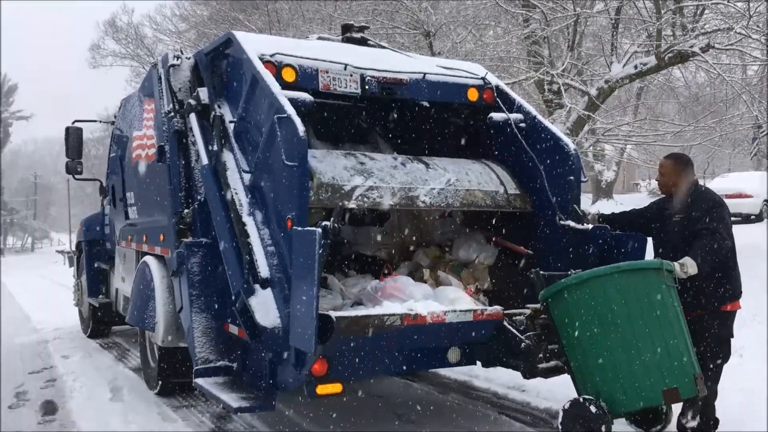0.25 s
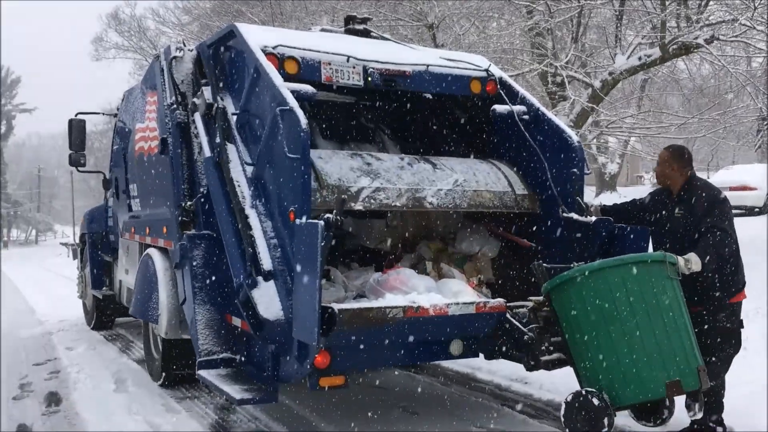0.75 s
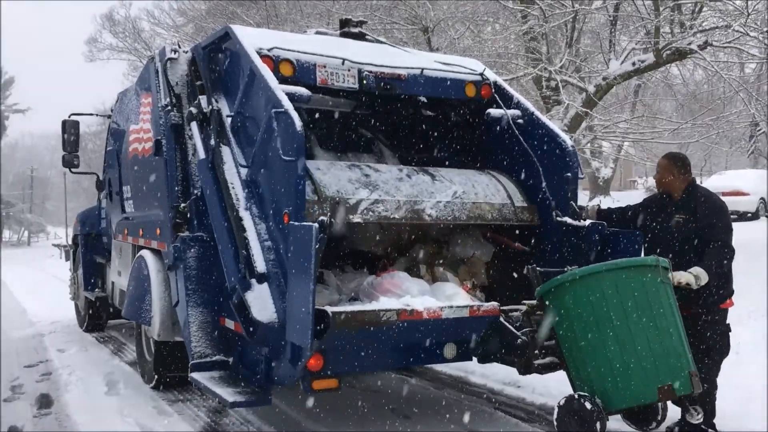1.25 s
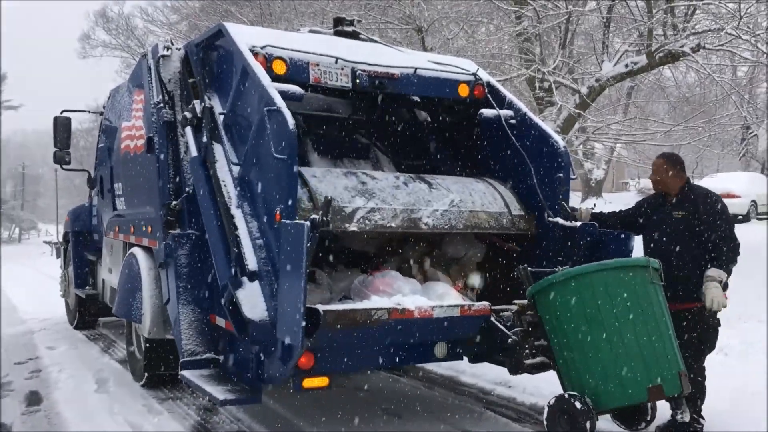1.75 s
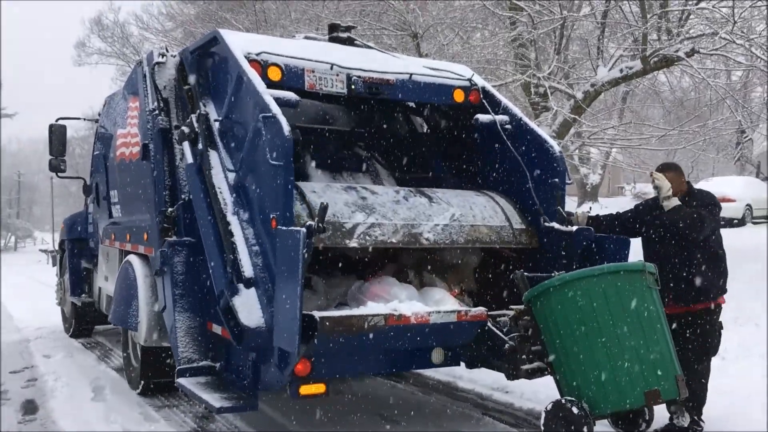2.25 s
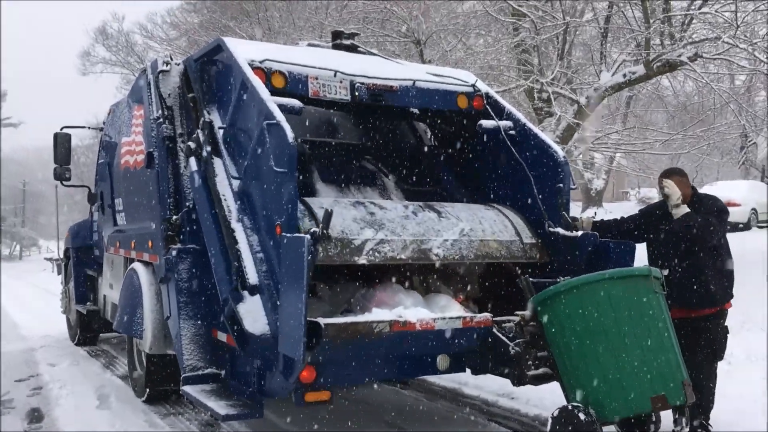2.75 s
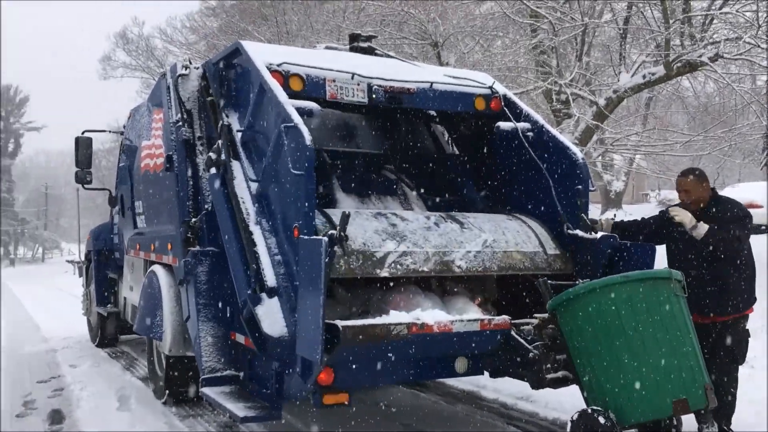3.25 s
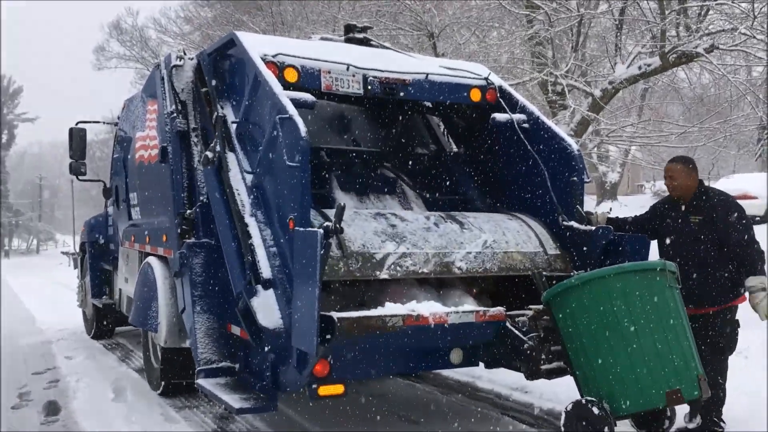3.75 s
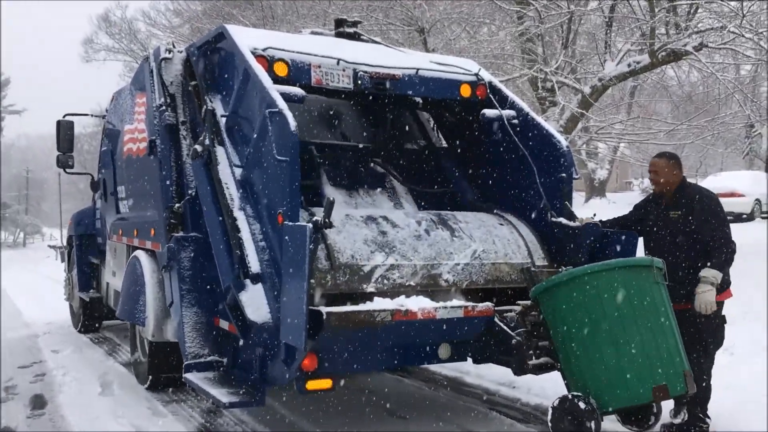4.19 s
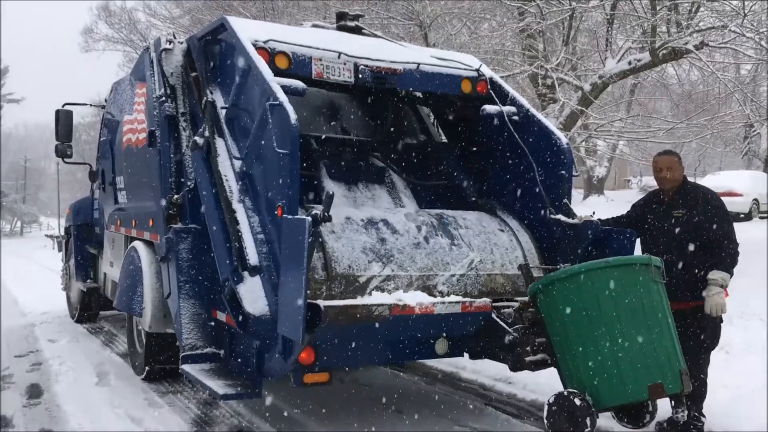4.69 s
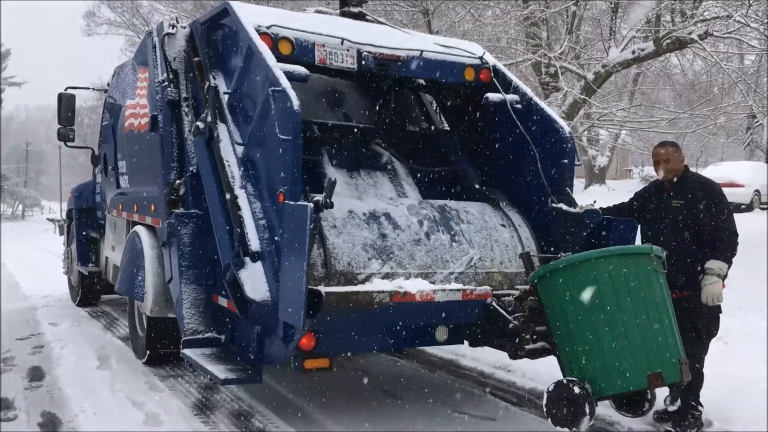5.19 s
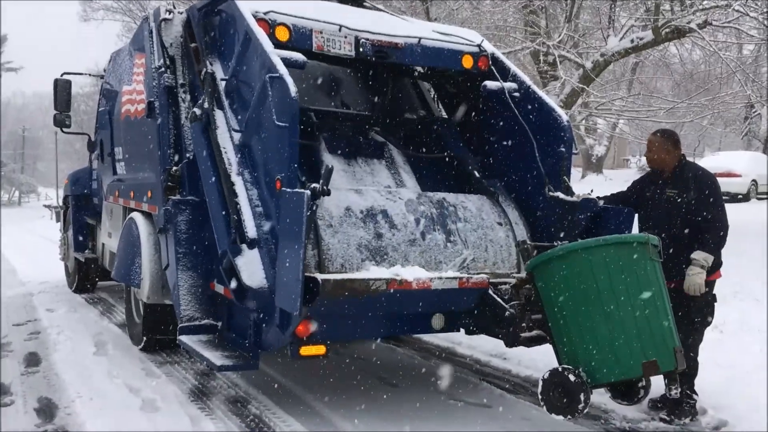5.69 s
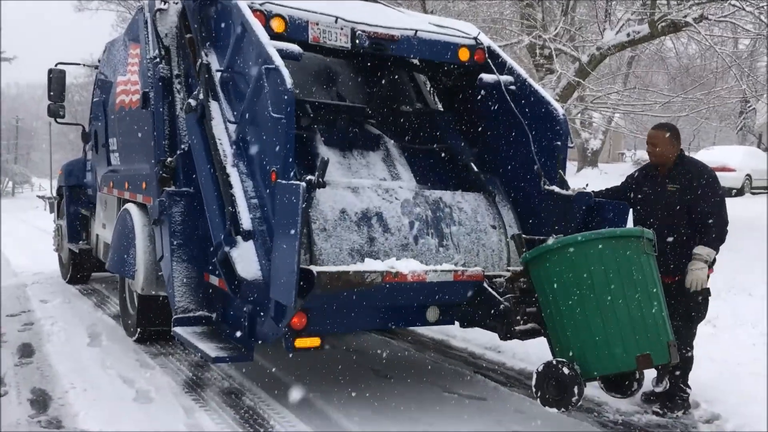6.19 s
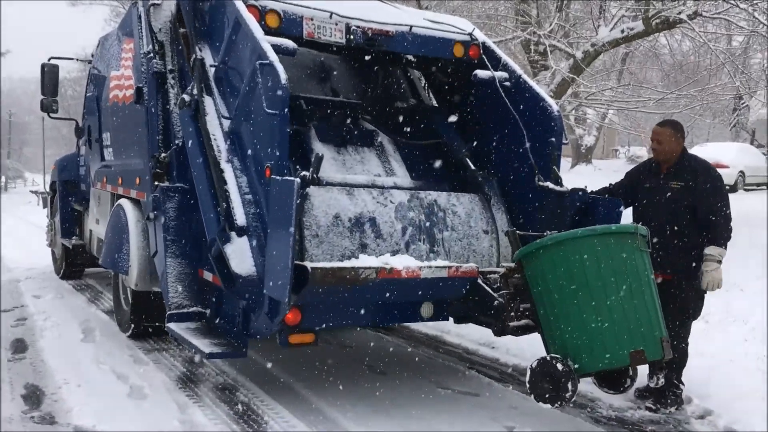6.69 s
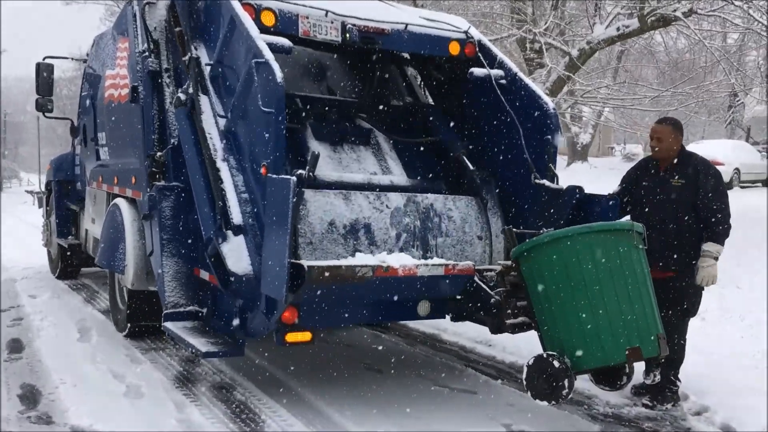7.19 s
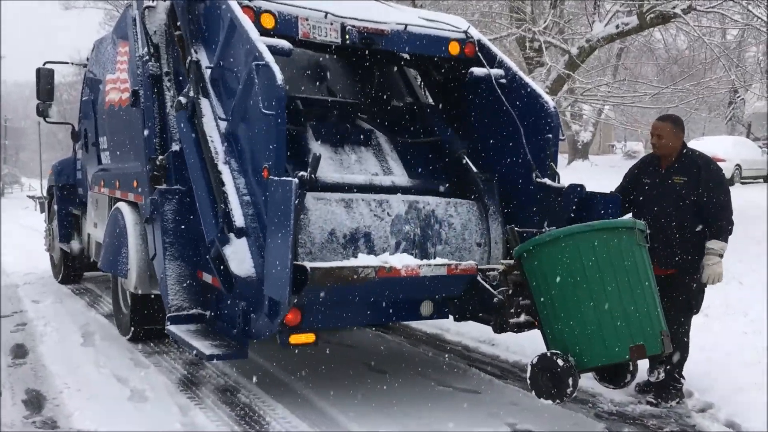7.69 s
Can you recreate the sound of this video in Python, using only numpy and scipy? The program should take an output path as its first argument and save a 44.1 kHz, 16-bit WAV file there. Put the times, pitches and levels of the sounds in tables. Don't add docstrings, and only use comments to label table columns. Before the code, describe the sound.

Close behind a garbage truck on a snowy street, a diesel engine holds raised revs under a hydraulic whine and oil hiss, with a few tiny hard ticks. About halfway the packer blade bottoms out with hollow booms, crunching load and clanking plates. Pitch sags in steps to idle amid whistling valves, then climbs back and holds.

```python
import sys
import numpy as np
from scipy import signal
from scipy.fft import irfft
from scipy.io import wavfile
from scipy.ndimage import uniform_filter1d

SR = 44100
rng = np.random.default_rng(int(sys.argv[2]) if len(sys.argv) > 2 else 0)


def boost_factor(decibels):
    exponent = np.asarray(decibels, float) / 20
    return 10 ** exponent


def wrap_up_sound(samples):
    columns = np.atleast_2d(samples).T
    tamed = np.clip(columns, -1, 1)
    steps = np.round(tamed * 32767).astype(np.int16)
    wavfile.write(sys.argv[1], SR, steps)


N = 350154
STEP = 256

# [t/s, f/Hz]
SPEED = [(3.85, 283.1), (3.95, 285.1), (4.07, 283.9), (4.2, 241.4), (4.3, 239.9), (4.36, 222.8),
         (4.43, 227), (4.51, 205), (4.73, 174.7), (4.87, 160), (4.94, 148.3), (5.19, 146.4), (5.28, 167.7),
         (5.56, 237.4), (5.66, 280.6), (5.76, 286), (5.95, 288), (7.94, 289.3)]
# [t/s, whine level/dB, second partial level/dB]
PRESSURE = [(0.0, -33, -32.5), (0.15, -40.5, -32.5), (0.37, -28, -36.5), (0.8, -26.5, -38),
            (1.55, -21.5, -39.5), (2.65, -23, -39), (3.8, -28, -38), (3.97, -20, -39), (4.43, -18, -44),
            (4.52, -19.5, -33.5), (4.8, -18, -37), (5.0, -23.5, -30), (5.17, -22, -34), (5.3, -16, -27.5),
            (5.66, -17, -43), (5.78, -20.5, -35.5), (5.9, -20, -35), (7.94, -18, -37)]
# [t/s, depth/dB, half width/s]
FADES = [(0.09, 18, 0.025), (3.93, 8, 0.023), (4.04, 3.5, 0.036), (4.144, 13.5, 0.045), (4.24, 13, 0.041),
         (4.355, 12, 0.058), (4.41, 8, 0.027), (4.5, 3.5, 0.011), (4.592, 13, 0.031), (4.665, 10, 0.022),
         (4.731, 8, 0.0086), (4.905, 18, 0.029), (5.215, 7, 0.025), (5.351, 15, 0.048), (5.438, 14, 0.028),
         (5.5, 10.5, 0.021), (5.558, 18, 0.03), (5.619, 17, 0.019), (5.385, 10, 0.0087), (4.99, 9, 0.012),
         (5.785, 6.5, 0.031)]
# [multiple of tooth rate, packing level/dB, return level/dB, idle level/dB]
OVERTONES = [(3, -54.5, -58, -51), (4, -56, -53.5, -41), (5, -48.5, -58, -94), (6, -57, -56, -71),
             (7, -57.5, -60, -59), (8, -57.5, -52, -79), (9, -60, -58, -75), (9.27, -57, -72, -90),
             (10.22, -64, -74, -90), (10, -54.5, -59, -90), (11, -62, -51.5, -81), (12, -51, -52, -59),
             (13, -82.5, -64, -60), (14, -79, -65, -80), (15, -64, -59.5, -72), (16, -77, -74, -87),
             (17, -77, -73, -82)]
# [multiple of crank speed, level/dB]
EXHAUST_PACK = [(0.5, -53), (1, -31), (1.5, -35), (2, -17), (2.5, -27), (3, 0), (3.5, -14.5), (4, -10.5),
                (4.5, -13.5), (5, -22), (5.5, -25), (6, -5.5), (6.5, -18), (7, -14), (7.5, -28.5), (8, -23),
                (8.5, -12.5), (9, -11.5), (9.5, -26), (10, -16), (10.5, -7), (11, -58), (11.5, 0),
                (12, -20), (12.5, -23), (13, -51), (13.5, -40), (14, -23.5)]
# [multiple of crank speed, level/dB]
EXHAUST_BACK = [(0.5, -41), (1, -25), (1.5, -29), (2, -17), (2.5, -18), (3, -1), (3.5, -38), (4, -8.5),
                (4.5, -5.5), (5, -15), (5.5, -15), (6, -5.5), (6.5, -17.5), (7, -13), (7.5, -28),
                (8, -15.5), (8.5, -42), (9, -17), (9.5, -32), (10, -24), (10.5, -34), (11, -25), (11.5, 0),
                (12, -13), (12.5, -22), (13, -38), (13.5, -39), (14, -35)]
# [multiple of crank speed, packing level/dB, return level/dB]
GEARS = [(15.0, -56, -67), (21.0, -62, -61), (22.0, -78, -58), (24.0, -51, -57), (24.5, -77, -59),
         (25.0, -62, -56), (27.0, -56, -70), (28.0, -58, -63), (36.0, -82, -63), (37.5, -67, -62),
         (38.0, -60, -67), (39.0, -64, -54), (40.0, -61, -59), (40.5, -52, -58), (41.0, -67, -61),
         (42.0, -64, -51), (42.5, -76, -61), (43.0, -54, -67), (43.5, -56, -70), (44.0, -77, -60),
         (45.0, -56, -62), (46.0, -60, -53), (46.5, -60, -63), (48.5, -64, -64), (49.0, -60, -62),
         (49.5, -65, -57), (51.0, -54, -61), (52.5, -67, -64), (53.0, -62, -76), (54.0, -59, -57),
         (55.0, -57, -55), (55.5, -62, -71), (56.0, -57, -57), (57.0, -64, -57), (57.5, -63, -65),
         (58.0, -78, -62), (59.5, -68, -61), (61.0, -81, -61), (61.5, -66, -58), (62.5, -57, -64),
         (64.0, -72, -65), (64.5, -60, -60), (67.0, -86, -62), (68.0, -72, -65), (69.0, -71, -60),
         (69.5, -73, -65), (72.0, -76, -59), (75.0, -69, -62), (79.5, -84, -64), (80.5, -84, -64),
         (81.0, -71, -63), (81.5, -74, -60), (86.5, -74, -64), (87.0, -79, -64), (93.5, -63, -72),
         (94.0, -64, -66), (95.5, -75, -68), (100.0, -89, -68), (103.5, -70, -67), (117.5, -66, -72)]
# [f/Hz, width/Hz, level/dB]
BLOCK = [(985, 47, -50.5), (1088, 138, -47.5), (1380, 220, -48), (1519, 90, -55.5), (2047, 420, -53.5),
         (3203, 630, -52.5)]
# [f/Hz, level/dB per Hz]
ROAR = [(15, -51), (25, -7.5), (76, -5.5), (229, -11.5), (250, -15.5), (285, -3.5), (311, -16.5),
        (354, -15.5), (431, -19.5), (470, -16.5), (524, -16.5), (571, -14), (710, -18), (850, -19.5),
        (1360, -19.5), (1850, -23.5), (4500, -34), (5850, -85), (9900, -120)]
# [f/Hz, level/dB per Hz]
ROAR_IDLE = [(15, -58), (25, -27.5), (107, -10), (155, -12), (220, -23.5), (304, -17), (421, -31.5),
             (560, -25), (826, -34.5), (962, -29.5), (2500, -38), (4500, -48), (5850, -82), (9900, -120)]
# [f/Hz, level/dB per Hz]
HISS = [(2060, -3.5), (3500, -9.5), (3640, -38), (4030, -23), (4490, -8), (4970, -12.5), (5500, -13.5),
        (6160, -9), (7850, -16), (9320, -10.5), (10400, -19.5), (11700, -10.5), (12600, -9), (15100, -15.5),
        (16000, -27)]
# [f/Hz, level/dB per Hz]
HISS_IDLE = [(2060, -27), (3500, -7), (5160, -3), (7700, -5), (9560, -0.5), (14300, 0), (16000, -8)]
# [t/s, peak level/dB, lower ring share/dB]
TICKS = [
    (0.059, -38, -6.5),
    (0.091, -44, 3.5),
    (0.425, -39, -20),
    (0.4798, -35, -12),
    (0.591, -34, -21),
    (1.0265, -41, -2.5),
    (1.0445, -49, 0),
    (5.0469, -50, -25),
    (7.462, -43, -9),
]
# [start f/Hz, end f/Hz, width/Hz, level/dB, start t/s, peak t/s, end t/s]
VALVES = [(3333, 3200, 344, -51, 4.2, 3.9, 4.95), (9306, 9800, 580, -55, 3.6, 4.4, 4.75),
          (9700, 9300, 710, -56, 4.45, 4.65, 5.65), (960, 970, 76, -47.5, 4.4, 4.95, 5.3),
          (2560, 3200, 200, -61, 4.6, 5.6, 4.8), (6450, 6300, 120, -66, 4.55, 4.75, 4.95),
          (6100, 6900, 300, -61, 4.95, 5.4, 5.7), (11300, 12000, 800, -60, 4.2, 5.3, 5.8),
          (4180, 4800, 185, -59, 4.9, 5, 5.24), (3210, 3300, 250, -58, 5.2, 5.32, 5.5),
          (6900, 7100, 386, -61, 5.3, 5.6, 5.75)]
# [t/s, level/dB, f/Hz, rise/s, t60/s]
BOOMS = [(3.87, -12.5, 54, 0.02, 0.37), (3.871, -4, 115.5, 0.018, 0.073), (3.93, -14, 89, 0.0076, 0.14),
         (3.952, -14, 290, 0.016, 0.12), (4.059, -11.5, 84, .01, 0.11), (4.095, -14, 101, 0.0069, 0.12),
         (4.14, -11.5, 72.4, 0.0036, 0.077), (4.18, -6.5, 61.5, 0.014, 0.14),
         (4.21, -5, 57.7, 0.0085, 0.12), (4.232, -14, 51.6, 0.0065, 0.075),
         (4.264, -8.5, 55, 0.0047, 0.069), (4.309, -20, 102.5, 0.015, 0.23), (4.401, -31, 114, 0.043, 0.39),
         (4.441, -29.5, 68.5, 0.054, 0.4), (4.6, -26, 60, .04, .3), (5.36, -31, 142, 0.039, .3),
         (5.5, -28, 128, 0.037, 0.39), (5.719, -23, 85.6, 0.078, .6)]
# [t/s, rms level/dB, rise/s, t60/s, brightness/dB, a quarter of the lift of sharp over
CRUNCH = [(3.863, -20.5, 0.021, 0.3, -5), (3.866, -34, .018, 0.068, 2.5), (3.922, -29, .004, 0.21, 1.5),
          (3.953, -14.5, 0.0035, 0.058, 4), (3.961, -22, 0.0034, 0.16, 3), (3.99, -32, 0.011, .3, 0.5),
          (4.021, -21.5, 0.019, 0.1, 3.5), (4.039, -21, 0.013, 0.14, 2), (4.085, -24, 0.012, 0.17, -1),
          (4.153, -28, 0.0031, 0.17, 1.5), (4.163, -29, 0.0061, 0.2, -3), (4.207, -34, .003, 0.31, -6.5),
          (4.26, -39.5, 0.01, 0.36, -1)]
# [f/Hz, level/dB per Hz]
LOAD = [(88, -19), (150, 2.5), (244, -4), (280, -3.5), (309, -6), (504, -14), (555, -17), (871, -22.5),
        (1240, -22.5), (2100, -27), (3350, -29), (4950, -30), (11000, -31.5), (16000, -28)]
# [f/Hz, width/Hz, level/dB]
STEEL = [(154, 25, -29), (774, 150, -32), (1244, 27, -37), (1480, 170, -46), (2550, 170, -33.5),
         (3280, 150, -32.5), (5740, 330, -41)]
# [t/s, f/Hz, width/Hz, level/dB, t60/s]
CLANKS = [(3.866, 3000, 500, -33, 0.21), (3.924, 5300, 500, -35, 0.1), (3.925, 2450, 400, -31, 0.16),
          (3.957, 3370, 350, -21, 0.069), (3.956, 1350, 302, -20, 0.31), (3.962, 8900, 600, -23, 0.067),
          (3.96, 700, 200, -26, 0.16), (4.2, 473, 30, -31.5, .4), (4.205, 7200, 400, -53, .06),
          (3.862, 565, 79, -24, 0.12), (3.955, 1840, 200, -21, 0.14), (4.036, 1660, 200, -33, 0.19),
          (4.045, 3500, 250, -35, 0.087), (4.208, 700, 500, -31, 0.044), (4.21, 400, 247, -24.5, 0.17),
          (4.219, 1120, 500, -50, 0.069), (4.296, 1380, 500, -45.5, .08), (5.047, 5950, 700, -49, .06),
          (5.198, 6300, 500, -55, .08), (4.245, 3120, 400, -42, 0.18)]

IDLE_HZ, WORK_HZ = 147, 285
TEETH_PER_TURN, FAN_PER_TURN, STROKE_CHANGE_S = 11.716, 19.83, 4.9
HUNT_PACK, HUNT_BACK = 0.0013, 0.0005
SLIDE_LOSS_DB, SLIDE_FLUTTER_DB = 5.5, 6.5
SURGE_S, SURGE_DB, SURGE_DB_PER_S = 5.3, -41, 25
PUMP_THROB = 0.21
SLAP_S, SLAP_DB, SLAP_SLIDE_DB = 0.1, -9.5, -6
EXHAUST_PACK_DB, EXHAUST_BACK_DB, EXHAUST_SAG_DB = -33.5, -33, 9
FAN_DB, FAN_PACK_DB = -44.5, 3.5
FAN_RING_HZ, FAN_RING_WIDTH_HZ, FAN_RING_DB = 290, 25, 12
GEAR_PACK_DB, GEAR_BACK_DB, GEAR_WOBBLE_DB, CLATTER_REPEAT = 2.5, 0.5, 1.1, 0.3
ROAR_DB, ROAR_IDLE_DB, HISS_DB, HISS_IDLE_DB = -36.5, -35.5, -47.5, -56
ROAR_PACK_DB, ROAR_BACK_DB = 1, -1.5
ROAR_DB_PER_HZ_S, HISS_COAST_DB_PER_HZ_S = 0.014, 0.017
HISS_START_DB, HISS_SETTLE_S, HISS_LEAD_S = 1.5, 0.8, 0.12
VALVE_THROB_DB, HISS_THROB_DB = 1.3, 1
TICK_SPIT_HZ, TICK_RING_HZ, TICK_SPIT_T60_S, TICK_RING_T60_S = 14600, 7150, 0.014, 0.087
STREET_T60_S, WHINE_WET_DB, STREET_WET_DB, SLAM_WET_DB = 0.68, -20, -13.5, -8.5


def slow(rate_hz, shape=()):
    knots = rng.standard_normal(shape + (int(N / SR * rate_hz) + 2,))
    return signal.resample(knots, N // STEP + 2, axis=-1)


def full(control):
    return np.interp(np.arange(N) / STEP, np.arange(len(control)), control)


def unit(x):
    return x / np.sqrt(np.mean(x ** 2))


def on_log(table, hz):
    f, db = np.transpose(table)
    return np.interp(np.log(hz + 1), np.log(f), db, left=-90, right=-90)


def colour(x, db_of):
    frame, overlap = 4096, 4096 - 1024
    hz, _, sheet = signal.stft(x, SR, nperseg=frame, noverlap=overlap)
    gain = boost_factor(db_of(hz[:, None], sheet.shape[1]))
    return signal.istft(sheet * gain, SR, nperseg=frame, noverlap=overlap)[1][:N]


def resonate(x, hz, width_hz):
    return signal.lfilter(*signal.iirpeak(hz, hz / width_hz, SR), x)


def resonate_twice(x, hz, width_hz):
    return resonate(resonate(x, hz, width_hz), hz, width_hz)


def swell(s, rise_s, t60_s):
    out, start = np.zeros(N), int(s * SR)
    t = np.arange(min(SR // 2, N - start)) / SR
    rise = np.sin(np.pi / 2 * np.clip(t / max(rise_s, 0.001), 0, 1))
    out[start:start + len(t)] = rise * boost_factor(-60 * np.clip(t - rise_s, 0, 1) / t60_s)
    return out


def tone(turns, db, wobble_db, rate_hz):
    level = full(np.sqrt(2) * boost_factor(db + wobble_db * slow(rate_hz)[:len(db)]))
    turns = turns + rng.random()
    return level * np.sin(2 * np.pi * (turns - np.floor(turns)).astype(np.float32))


def pump(teeth, whine_db, second_db, speed, steady):
    t = np.arange(0, N, STEP) / SR
    back = t > STROKE_CHANGE_S
    whine_db, second_db, speed, steady = (c[::STEP] for c in (whine_db, second_db, speed, steady))
    whine = tone(teeth, whine_db, 0.3, 12)
    overtones = tone(2 * teeth, second_db, 0.48, 6.4)
    quarter_turn = np.cos(np.pi / 2 * teeth[::STEP] / TEETH_PER_TURN)
    throb_db = 20 * np.log10(1 + PUMP_THROB * back * quarter_turn)
    for k, pack_db, back_db, idle_db in OVERTONES:
        work_db = np.where(back, back_db, pack_db)
        level_db = idle_db + (work_db - idle_db) * speed ** 2
        smear_db = min(8 * k - 16, 26) * (1 - steady)
        overtones += tone(k * teeth, level_db - smear_db + (k > 10) * throb_db, 1.5 + 3 * (1 - steady), 11)
    since = t - SURGE_S
    drop_db = np.where(since > 0, SURGE_DB_PER_S * since, -300 * since)
    overtones += tone(3 * teeth, SURGE_DB - drop_db, 1.47, 9.8)
    return whine, overtones


def gears(crank, sag):
    orders, pack_db, back_db = np.transpose(GEARS)
    back, out = np.arange(N) / SR > STROKE_CHANGE_S, 0
    place = crank / 2 % 1 * 8192
    stroke_db = np.array([pack_db + GEAR_PACK_DB, back_db + GEAR_BACK_DB])
    for first in range(3):
        spectrum = np.zeros((2, 4097), complex)
        bins = np.round(2 * orders[first::3]).astype(int)
        phase = np.exp(2j * np.pi * rng.random(len(bins)))
        spectrum[:, bins] = boost_factor(stroke_db[:, first::3]) * phase
        cycles = irfft(spectrum) * 4096 * np.sqrt(2)
        packing, returning = (np.interp(place, np.arange(8193), np.append(w, w[0])) for w in cycles)
        level = full(boost_factor(GEAR_WOBBLE_DB * slow(7)[:len(sag)] - 17 * sag))
        out += np.where(back, returning, packing) * level
    return out


def fan(crank, sag, back):
    fan_hz = (IDLE_HZ + (WORK_HZ - IDLE_HZ) * (1 - sag)) * FAN_PER_TURN / TEETH_PER_TURN
    ring_db = FAN_RING_DB * np.exp(-((fan_hz - FAN_RING_HZ) / FAN_RING_WIDTH_HZ) ** 2)
    level_db = FAN_DB + FAN_PACK_DB * ~back - 9 * np.sqrt(sag) + ring_db
    return tone(FAN_PER_TURN * crank, level_db, 0.97, 6)


def clatter(crank):
    pattern = rng.standard_normal(2048)
    repeat = np.interp(crank / 2 % 1 * 2048, np.arange(2048), pattern, period=2048)
    knock = 0.31 + np.exp(-(3 * crank % 1) / 0.53)
    drive = knock * (CLATTER_REPEAT * repeat + rng.standard_normal(N))
    return sum(boost_factor(db) * unit(resonate_twice(drive, f, w)) for f, w, db in BLOCK)


def engine(crank, speed, roar_db):
    back = np.arange(0, N, STEP) / SR > STROKE_CHANGE_S
    sag, out = 1 - speed[::STEP], 0
    for (k, pack_db), (_, back_db) in zip(EXHAUST_PACK, EXHAUST_BACK):
        if abs(k - TEETH_PER_TURN) > 1.3 and max(pack_db, back_db) > -24:
            level_db = np.where(back, back_db + EXHAUST_BACK_DB, pack_db + EXHAUST_PACK_DB)
            out += tone(k * crank, level_db - EXHAUST_SAG_DB * sag, 0.61, 5)
    out += gears(crank, sag) + fan(crank, sag, back)
    return out + clatter(crank) * boost_factor(roar_db - 17.5 * (1 - speed))


def rush(speed, level_db, work, idle, work_db, idle_db, flicker_db, throb_db):
    def spectrum_db(table, total_db, hz):
        db = on_log(table, hz)
        return db + total_db - 10 * np.log10(np.mean(boost_factor(2 * db)))

    def sheet(hz, count):
        share = np.interp(np.arange(count) * 1024, np.arange(N), speed)
        at_work, at_idle = spectrum_db(work, work_db, hz), spectrum_db(idle, idle_db, hz)
        walks = slow(6, (12,))[:, :4 * count:4]
        walks = np.pad(walks, ((0, 0), (0, count - walks.shape[1])), "edge")
        band = np.clip(1.1 * np.log2(hz[:, 0] / 20 + 1), 0, 11).astype(int)
        return at_idle + (at_work - at_idle) * share + flicker_db * walks[band]

    return colour(rng.standard_normal(N), sheet) * boost_factor(level_db + throb_db * full(slow(14)))


def street(x, wet_db):
    t = np.arange(SR) / SR
    tail = rng.standard_normal(SR) * boost_factor(-60 * t / STREET_T60_S) * (t > 0.03)
    tail = signal.lfilter(*signal.butter(1, 1200, fs=SR), tail / np.linalg.norm(tail))
    return x + boost_factor(wet_db) * signal.fftconvolve(x, tail)[:N]


def ticks():
    spit = sum(boost_factor(db) * swell(s, 0.0019, TICK_SPIT_T60_S) for s, db, _ in TICKS)
    ring = sum(boost_factor(db + low_db) * swell(s, 0.002, TICK_RING_T60_S) for s, db, low_db in TICKS)
    bright = unit(resonate_twice(rng.standard_normal(N), TICK_SPIT_HZ, 4000))
    low = sum(unit(resonate(rng.standard_normal(N), k * TICK_RING_HZ, 450)) for k in (1, 2))
    return spit * bright + ring * low


def valves(crank):
    t, out = np.arange(N) / SR, 0
    for from_hz, to_hz, width_hz, db, *times in VALVES:
        span = slice(int(times[0] * SR), int(times[2] * SR))
        noise = signal.lfilter(*signal.butter(2, width_hz / 2, fs=SR), rng.standard_normal((2, SR * 2)))
        noise = noise[:, :span.stop - span.start]
        phase = 2 * np.pi * np.cumsum(np.interp(t[span], times[::2], [from_hz, to_hz])) / SR
        band = np.zeros(N)
        band[span] = unit(noise[0] * np.cos(phase) + noise[1] * np.sin(phase))
        envelope = np.sqrt(np.interp(t, times, [0, 1, 0]))
        out += boost_factor(db) * band * envelope * boost_factor(2.5 * full(slow(40)))
    return out * boost_factor(VALVE_THROB_DB * np.cos(2 * np.pi * crank))


def boom(s, db, hz, rise_s, t60_s):
    out = boost_factor(db) * swell(s, rise_s, t60_s)
    span = slice(int(s * SR), int(s * SR) + SR // 2)
    t = np.arange(SR // 2) / SR
    out[span] *= np.sin(2 * np.pi * hz * t * (1 - 1.16 * np.clip(t, 0, 0.2)))
    return out


def crunch():
    grit = rng.standard_normal(N) * boost_factor(1.9 * full(slow(160)))
    load = unit(colour(grit, lambda hz, count: on_log(LOAD, hz)))
    dull = signal.lfilter(*signal.butter(1, 900, fs=SR), load)
    blows = np.zeros(N)
    for s, db, rise_s, t60_s, bright_db in CRUNCH:
        tilted = dull * boost_factor(-2 * bright_db) + (load - dull) * boost_factor(2 * bright_db)
        blows += boost_factor(db) * swell(s, rise_s, t60_s) * tilted
    plates = 0
    for f, width_hz, db in STEEL:
        ring = resonate(blows, f, width_hz)
        plates += boost_factor(db) * ring / np.abs(ring).max() * 3
    return blows + plates


def clanks():
    out = np.zeros(N)
    for s, f, width_hz, db, t60_s in CLANKS:
        span = slice(int(s * SR), int(s * SR) + SR // 2)
        rattle = unit(resonate_twice(rng.standard_normal(SR // 2), f, 1.6 * width_hz))
        out[span] += boost_factor(db) * swell(s, 0.0018, t60_s)[span] * rattle
    return out


def slam():
    return sum(boom(*row) for row in BOOMS) + crunch() + clanks()


def scene():
    t = np.arange(N) / SR
    back = t > STROKE_CHANGE_S
    hz = uniform_filter1d(np.interp(t, *np.transpose(SPEED)), size=2000)
    hunt = np.where(back, HUNT_BACK, HUNT_PACK) * full(slow(3))
    teeth = np.cumsum(hz * (1 + hunt)) / SR
    crank = teeth / TEETH_PER_TURN
    speed = np.clip((hz - IDLE_HZ) / (WORK_HZ - IDLE_HZ), 0, 1)
    pull = np.gradient(uniform_filter1d(hz, size=3500)) * SR
    effort = uniform_filter1d(pull, size=9000)
    steady = np.exp(-np.abs(pull) / 70)

    fade_db = sum(db * np.interp(t[::64], [s - 1.26 * w, s, s + 1.48 * w], [0, 1, 0]) for s, db, w in FADES)
    cancel = boost_factor(-np.repeat(fade_db, 64)[:N])
    s, whine_db, second_db = np.transpose(PRESSURE)
    whine_db = np.interp(t, s, whine_db)
    slide_db = (1 - steady) * (SLIDE_FLUTTER_DB * full(slow(25)) - SLIDE_LOSS_DB)
    second_db = np.interp(t, s, second_db) + slide_db
    roar_db = np.where(back, ROAR_BACK_DB, ROAR_PACK_DB) * speed + ROAR_DB_PER_HZ_S * effort
    hiss_db = 0.62 + HISS_START_DB * np.exp(-t / HISS_SETTLE_S)
    hiss_db += HISS_COAST_DB_PER_HZ_S * np.minimum(effort, 0) + HISS_THROB_DB * np.cos(np.pi * crank)

    whine, overtones = pump(teeth, whine_db, second_db, speed, steady)
    slap = int(SLAP_S * SR)
    late = boost_factor(SLAP_DB) * np.clip(pull / 300, 0, 1) * np.roll(whine, slap)
    overtones = overtones + boost_factor(SLAP_SLIDE_DB) * (1 - steady) * np.roll(overtones, slap)
    truck = cancel * street(whine, WHINE_WET_DB) + late
    truck += street(overtones * cancel ** 0.41 + engine(crank, speed, roar_db), STREET_WET_DB)
    truck += rush(speed, roar_db, ROAR, ROAR_IDLE, ROAR_DB, ROAR_IDLE_DB, 1.0, 0.53)
    flow = np.roll(speed, -int(HISS_LEAD_S * SR))
    truck += rush(flow, hiss_db, HISS, HISS_IDLE, HISS_DB, HISS_IDLE_DB, 0.81, 0.55)
    truck += ticks() + valves(crank) + street(slam(), SLAM_WET_DB)
    return truck[None]


def low_pass(x):
    return signal.sosfilt(signal.butter(12, 16520, fs=SR, output="sos"), x)


def record(dry):
    x = signal.sosfilt(signal.butter(4, 38, "high", fs=SR, output="sos"), dry[0])
    x = x / (1 + np.abs(x) ** 8) ** 0.125
    x = signal.sosfilt(signal.ellip(10, 0.3, 70, 15800, fs=SR, output="sos"), x)
    return low_pass(x)


dry = scene()
out = record(dry)
wrap_up_sound(out)
```